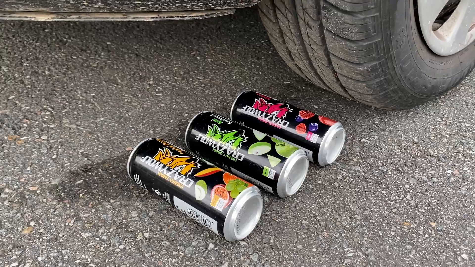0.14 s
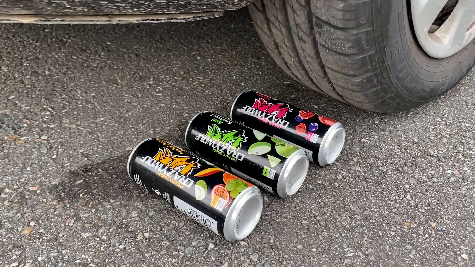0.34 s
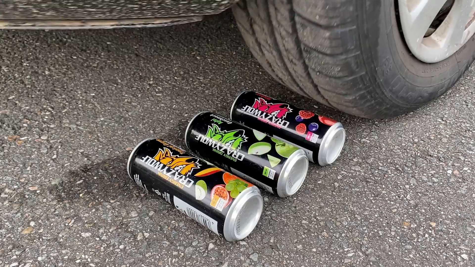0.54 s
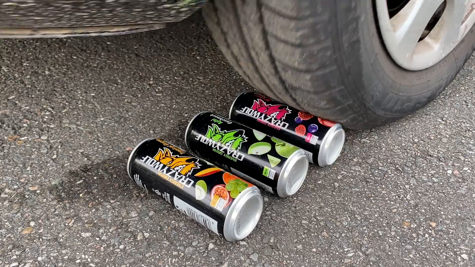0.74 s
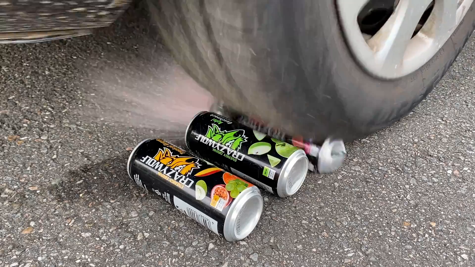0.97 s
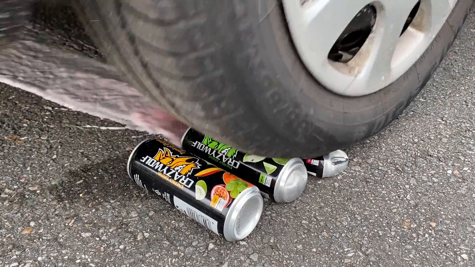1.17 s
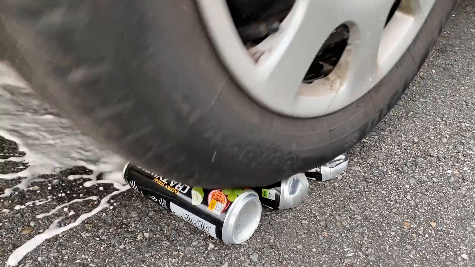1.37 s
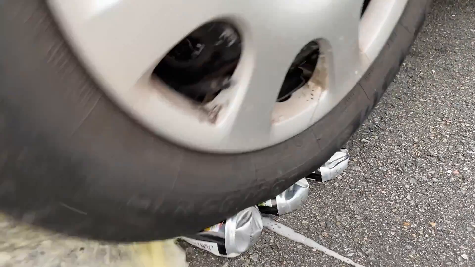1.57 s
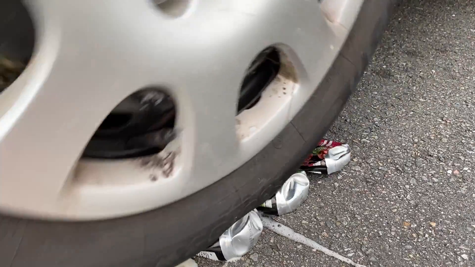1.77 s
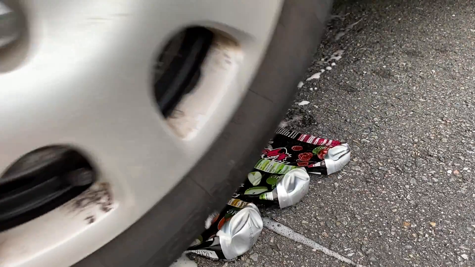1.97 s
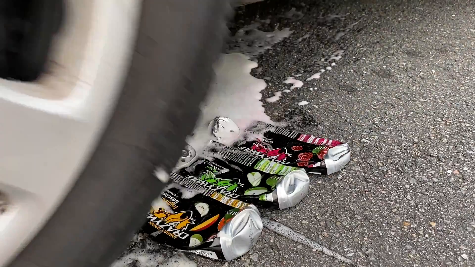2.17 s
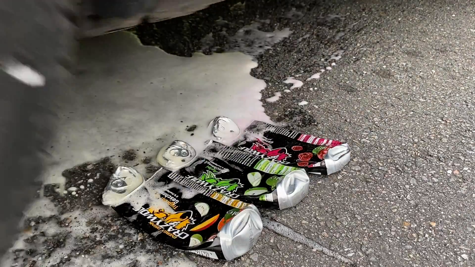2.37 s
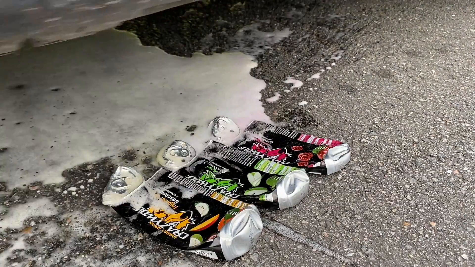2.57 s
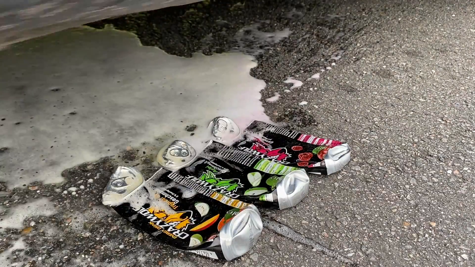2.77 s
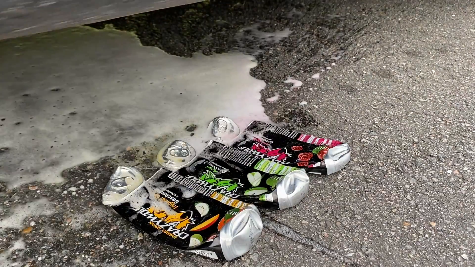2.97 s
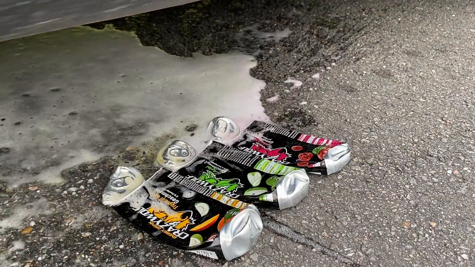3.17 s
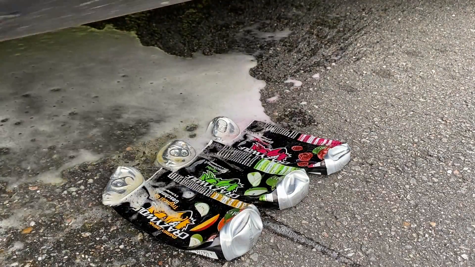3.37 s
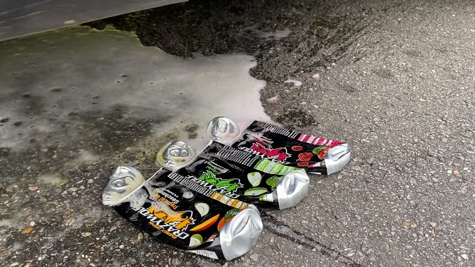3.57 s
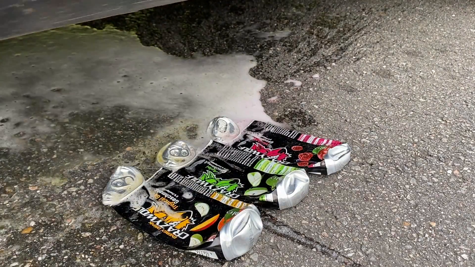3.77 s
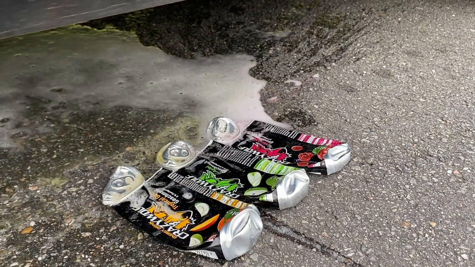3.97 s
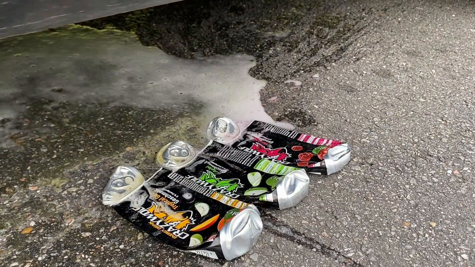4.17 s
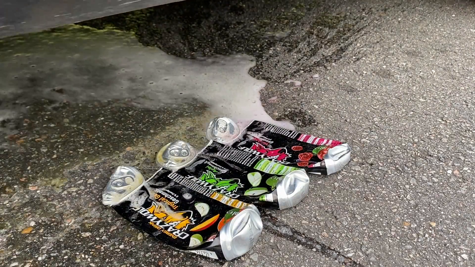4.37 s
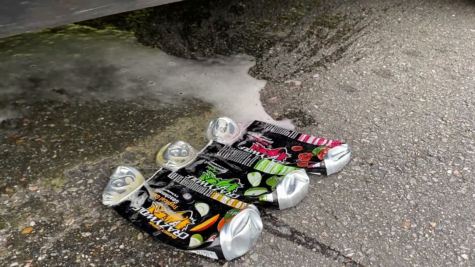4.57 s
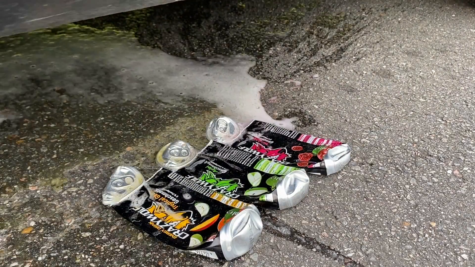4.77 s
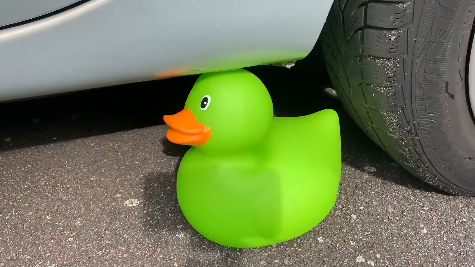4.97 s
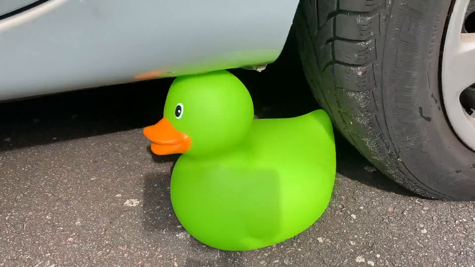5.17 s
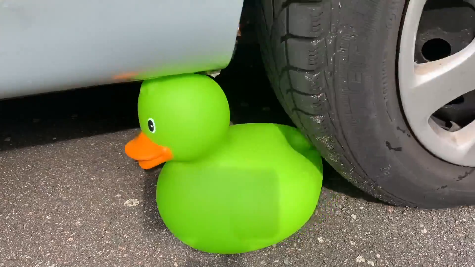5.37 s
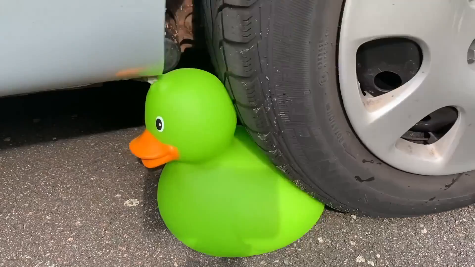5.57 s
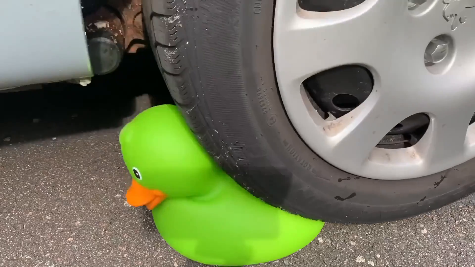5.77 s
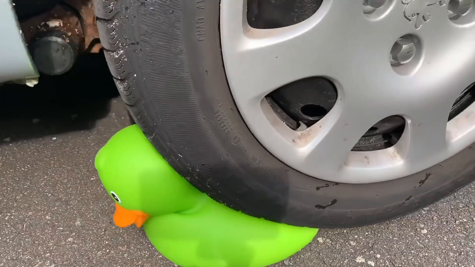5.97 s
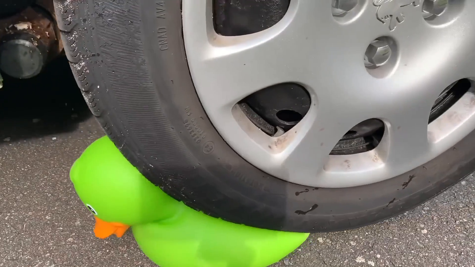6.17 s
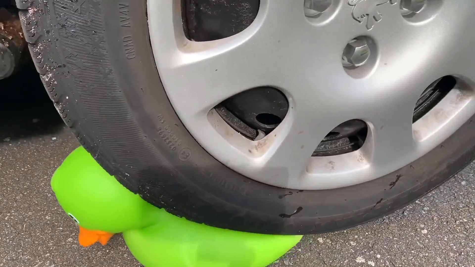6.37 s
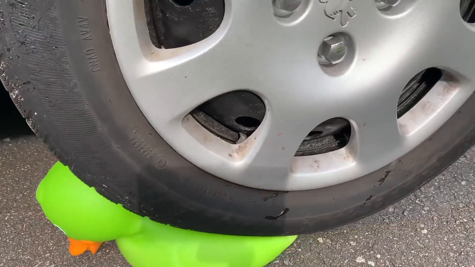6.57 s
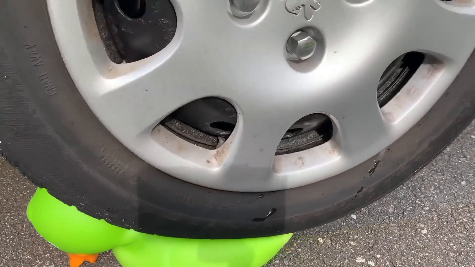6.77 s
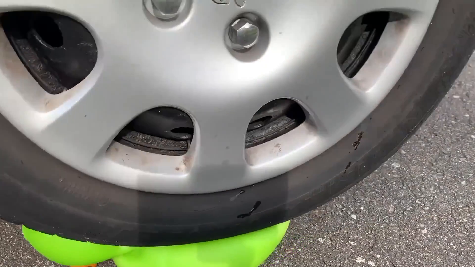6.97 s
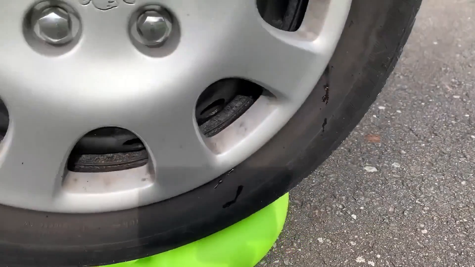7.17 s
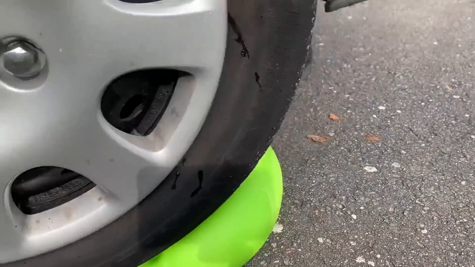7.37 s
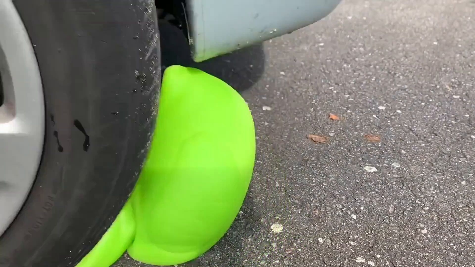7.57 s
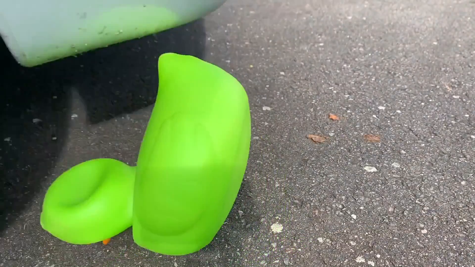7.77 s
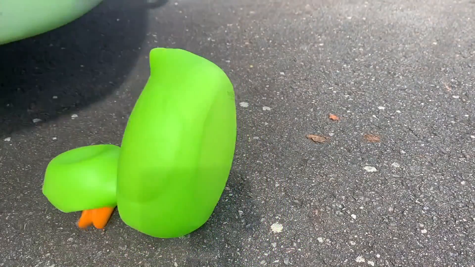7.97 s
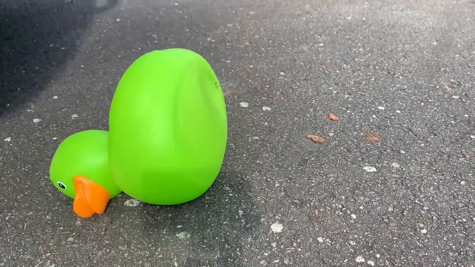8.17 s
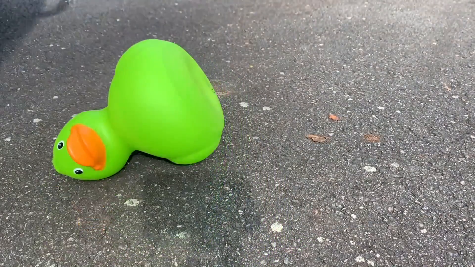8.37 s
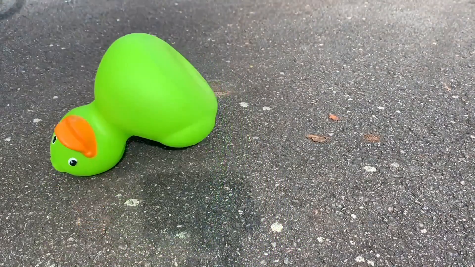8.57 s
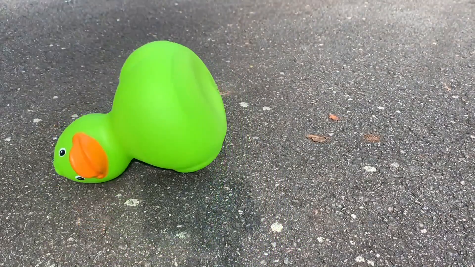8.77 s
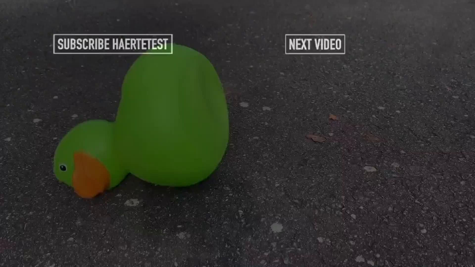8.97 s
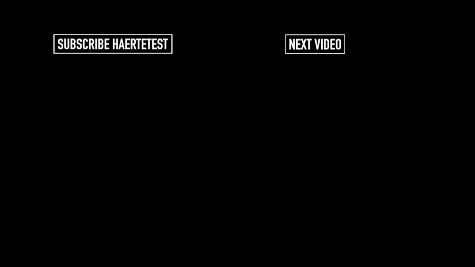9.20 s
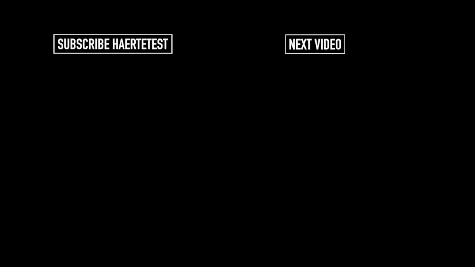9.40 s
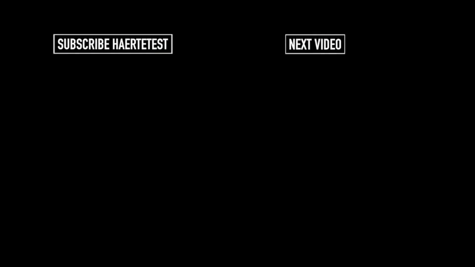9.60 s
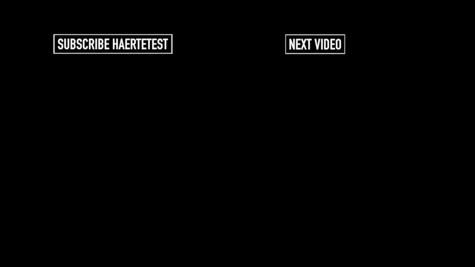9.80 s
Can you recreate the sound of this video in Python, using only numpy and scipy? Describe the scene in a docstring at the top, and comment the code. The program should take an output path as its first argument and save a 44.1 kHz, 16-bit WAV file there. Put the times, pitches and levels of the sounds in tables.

```python
"""Ticking engine noise and a straining hum come first, then loud metallic cracks: a car rolls over three full
drink cans on asphalt and idles some way off. The second scene is close to its exhaust: the engine revs up and
down while a tyre squashes a hollow rubber toy, then all fades. Engines are multiples of the firing rate under
resonances, plus noise bands; cans are noise bursts with damped modes; the toy is pops, grit and scrapes."""
import sys
import numpy as np
from scipy import signal
from scipy.fft import rfft, irfft, next_fast_len
from scipy.io import wavfile
from scipy.ndimage import uniform_filter1d, map_coordinates

SR = 44100
rng = np.random.default_rng(int(sys.argv[2]) if len(sys.argv) > 2 else 0)


def int16_out(signal):
    """Quantize to a 16-bit WAV file."""
    q = np.round(np.clip(np.atleast_2d(signal).T, -1, 1) * 32767)
    wavfile.write(sys.argv[1], SR, q.astype(np.int16))


N = 433944
T = np.arange(N) / SR

# street noise, three bands: t/s, rumble level/dB, roar level/dB, hiss level/dB
STREET_LEVELS = [(0.0, -44.5, -36.5, -44.5), (0.3, -40.5, -36, -43), (0.62, -34, -31.5, -38),
                 (0.82, -36, -30.5, -35), (0.94, -24, -55, -44.5), (1.05, -41.5, -43.5, -48),
                 (1.3, -33, -37.5, -40.5), (1.48, -44, -40.5, -42.5), (1.79, -49, -47.5, -51.5),
                 (2.15, -50, -45, -54.5), (2.55, -57, -49.5, -54), (2.84, -53.5, -51.5, -55.5),
                 (3.45, -55.5, -52.5, -57.5), (3.98, -54.5, -53, -58), (4.38, -50.5, -50, -55.5),
                 (4.98, -48, -48, -54)]
# street band colours: f/Hz, level/dB per Hz
STREET_RUMBLE_COLOUR = [(12, -36.5), (20, -25.5), (80, -4.5), (136, -5), (156, -4), (268, -8), (400, -13),
                        (520, -36.5), (880, -120)]
STREET_ROAR_COLOUR = [(180, -39), (300, -10), (334, -4.5), (402, -10), (438, 1), (587, -3.5), (741, -1.5),
                      (806, -1.5), (1900, -11), (2470, -28.5), (4180, -120)]
STREET_HISS_COLOUR = [(1200, -41.5), (1800, -4), (2400, 0), (3200, -2.5), (4200, -7.5), (5500, -8),
                      (8000, -20), (9000, -29.5), (12000, -21.5), (16000, -63)]
# car body ringing in the street noise: f/Hz, width/Hz, boost/dB
STREET_RINGS = [(742, 35, 1.5), (1350, 33, 2.5), (1800, 150, 1), (2280, 300, 1)]
# left-right likeness, street and close noise: f/Hz, likeness (-1 to 1)
STREET_LIKENESS = [(60, 0.97), (170, .89), (350, 0.35), (800, 0.69), (2000, 0.14), (3000, 0.077),
                   (5000, .3), (7800, 0.075), (8600, -0.21)]
CLOSE_LIKENESS = [(60, 1), (350, 0.92), (700, 0.22), (1300, 0.16), (3000, .14), (7000, 0.094), (8400, 0.36)]
# left-right balance of the noise: f/Hz, left over right/dB
LEFT_OVER_RIGHT = [(60, 0), (250, 0), (500, 2), (900, 4), (1500, 1), (2600, 3), (5000, 0.5), (8000, -0.5)]
# sheet metal under the car: f/Hz, flutter width/Hz, relative level/dB, loudest at t/s, swell scale/s
PANELS = [(350, 12, -71, 3.6, 1.3), (447, 12, -69, 3.6, 1.3), (1760, 160, -66, 4.5, .45),
          (750, 40, -60, 2.3, .3), (900, 200, -57, 2.82, .12), (1580, 20, -54, 5.57, .07),
          (533, 25, -44, 5.55, .3), (754, 12, -36, 5.5, .3), (926, 20, -46, 5.7, .12),
          (795, 12, -36, 6.57, .13), (750, 15, -40, 6.45, .1), (926, 20, -36, 6.66, .14),
          (1080, 20, -41, 7.03, .12), (1080, 40, -40, 6.67, .04), (1233, 40, -52, 6.75, .1),
          (1583, 20, -42, 6.81, .07), (2213, 25, -48, 6.9, .09), (2100, 25, -50, 7.02, .06),
          (3144, 30, -54, 6.77, .09), (3540, 60, -50, 6.65, .02), (3596, 20, -54, 6.92, .06),
          (4113, 20, -50, 6.81, .045), (4800, 60, -57, 6.43, .05), (4850, 90, -50, 6.66, .04),
          (4947, 60, -51, 6.88, .18), (2430, 70, -66, 8.1, .15), (3200, 70, -67, 8.12, .07),
          (2500, 50, -67, 8.4, .12), (3160, 90, -63, 8.57, .05), (1900, 60, -65, 8.8, .1),
          (538, 25, -46, 8.8, .24), (380, 12, -46, 8.75, .13), (5916, 12, -75, 8.93, .19)]
# engine from the side, arriving, rolling on, idling: t/s, firing rate f/Hz, load level/dB, first multiple level/dB
FAR_ENGINE = [(0.15, 31, -57, -70), (0.46, 33.16, -46, -57), (0.66, 36.1, -36, -52), (0.83, 39.7, -35, -49),
              (1.0, 37.7, -60, -64), (1.7, 35.13, -59.5, -73), (2.1, 36.36, -45, -61),
              (2.33, 34.1, -56, -70), (2.45, 33.2, -66, -66), (3.3, 26.9, -54.5, -72),
              (3.41, 24.7, -54, -72), (3.54, 24.92, -45.5, -82), (3.93, 23.56, -48, -78),
              (4.3, 23.41, -50, -76), (4.88, 23.46, -40, -67), (4.97, 23.24, -42, -63)]
# 2nd to 8th multiples from the side, above load: f/Hz, level/dB
FAR_BOOM = [(48, -24), (62, 3.5), (72, 1), (82, -0.5), (95, -17), (108, -23.5), (120, -16.5), (145, -12),
            (165, -18.5), (190, -13.5), (260, -28.5)]
# exhaust resonances, from the side and close: f/Hz, width/Hz, level/dB
FAR_PIPE = [(119.6, 20.54, -2.5), (195, 20, -2.5), (257.5, 49, -11)]
CLOSE_PIPE = [(168, 31.3, -1.5), (256, 34, 1.5), (314, 43, -9), (385, 35, -11), (535, 45, -13),
              (640, 50, -12), (943, 123, -19)]
# first can straining before it gives: t/s, f/Hz, relative level/dB
GROAN = [(0.49, 211.6, -54), (0.53, 201.5, -28.5), (0.56, 286.4, -37), (0.6, 289, -26), (0.656, 261, -30),
         (0.72, 227, -39), (0.78, 202, -44)]
# engine near the tail pipe; the first multiple booms most with the throttle shut:
# t/s, firing rate f/Hz, load level/dB, first multiple level/dB
CLOSE_ENGINE = [(4.99, 32.8, -20.5, -23), (5.13, 35, -18, -30), (5.3, 37.6, -18.5, -31),
                (5.55, 40.06, -17.5, -37), (5.73, 40.45, -18, -44), (5.82, 38.77, -18, -36),
                (5.9, 35, -32, -27), (6.01, 30.17, -26, -21), (6.16, 27.16, -22, -26),
                (6.3, 27.98, -16, -21.5), (6.39, 31.63, -12.5, -22.5), (6.5, 38.6, -16.5, -18),
                (6.57, 42.44, -14.5, -27), (6.63, 46.9, -8, -21), (6.73, 54.84, -6, -20),
                (6.78, 57.5, -5.5, -18), (6.84, 60.5, -5, -20), (6.92, 63.07, -5.5, -18),
                (7.0, 64.54, -5.5, -21.5), (7.08, 61.44, -4.5, -28), (7.14, 56.7, -9.5, -25.5),
                (7.22, 52.67, -16.5, -24), (7.32, 46.27, -26.5, -24), (7.51, 37.4, -22.5, -25),
                (7.6, 31.9, -26, -22), (7.68, 28.65, -30, -19.5), (7.81, 26.56, -40.5, -24.5),
                (7.87, 26.2, -37, -33.5), (8.12, 24.02, -43, -32.5), (8.35, 21.46, -28.5, -46),
                (8.45, 24.04, -24.5, -33), (8.5, 27.64, -20.5, -26), (8.55, 31.58, -19.5, -23),
                (8.6, 34.4, -16, -20), (8.65, 37.03, -18.5, -25), (8.72, 38.23, -18.5, -31.5),
                (8.84, 37.6, -18.5, -29.5), (9.0, 33.62, -21.5, -36.5), (9.15, 31.8, -30, -32)]
# 2nd to 8th multiples, above load: f/Hz, near end level/dB, level once rolled past/dB
CLOSE_BOOM = [(44.8, -9, -2), (58.9, -6.5, -10), (68.6, -12.5, -18), (83.5, -3, 0), (94.8, -10.5, -20),
              (102.7, -19.5, -31), (118.3, -32.5, -34.5), (127.6, -11.5, -10.5), (139, -9.5, -8.5),
              (158.4, -5, -4.5), (172.8, -9, -12), (190.3, -22.5, -29), (218.8, -17.5, -12.5),
              (231, -18.5, -5.5), (249, -23.5, -8.5), (267.4, -20, -5.5), (308, -26, -25),
              (340, -28.5, -28), (400, -47, -30), (519, -34.5, -36)]
# own strength of the 2nd to 8th multiples: level/dB
MULTIPLES_DB = [1, -0.5, 1.5, -3, -5.5, -4.5, -3.5]
# multiples coming and going with the throttle: t/s, 2nd level/dB, 4th level/dB, 5th to 8th level/dB
THROTTLE = [(4.99, 3, 2, 2.5), (5.5, -1.5, 1.5, 2), (5.7, 0, 2, 2.5), (5.86, -13, 2, -2),
            (6.08, -12, 5, 7.5), (6.25, -3, 7, 2), (6.36, -1.5, -3, -3), (6.43, 2, 3, 4.5), (6.5, 3, -1, 7),
            (6.57, 2.5, -4.5, 12), (6.64, 4, 11, 7), (6.71, 5, 5, -3), (6.82, 7, -10, -4),
            (6.95, -1.5, 0, 2), (7.13, -10, -11.5, -13), (7.2, -5, -20, -4), (7.3, 3, -2, -6),
            (7.7, -2.5, -0.5, 1), (8.3, 2, -9, -5), (8.45, -6, 5, 4), (8.52, -1, 8, 6), (8.6, 0, 0.5, -4),
            (8.7, -7, 2, -3), (8.9, -11, -1, -3), (9.15, -6, -4, 0.5)]
# tail pipe moving across: t/s, phase by which left leads/rad
PIPE_SWING = [(4.99, -0.32), (6.8, -0.26), (7.6, -0.17), (8.5, 0.36), (9.2, 0.49)]
# noise near the tail pipe: t/s, rumble level/dB, roar level/dB, hiss level/dB
CLOSE_LEVELS = [(4.99, -45, -31.5, -46), (5.2, -33, -31.5, -44), (5.55, -45, -28.5, -42),
                (5.8, -49, -31, -44), (5.88, -65, -31.5, -49), (6.02, -29.5, -34, -43),
                (6.23, -33, -35, -40), (6.32, -35, -32.5, -44.5), (6.45, -32, -29.5, -40.5),
                (6.65, -37, -22.5, -35), (6.88, -48, -23, -34.5), (7.11, -45, -26, -40),
                (7.24, -63, -31, -44.5), (7.52, -36, -34, -48.5), (7.72, -36.5, -36, -49),
                (7.82, -37, -42, -52.5), (8.1, -40, -43.5, -52), (8.36, -32, -42.5, -53.5),
                (8.57, -24, -39, -49.5), (8.68, -30, -39.5, -51.5), (8.96, -38, -42.5, -55),
                (9.15, -38, -49.5, -61)]
# close band colours: f/Hz, level/dB per Hz
CLOSE_RUMBLE_COLOUR = [(12, -28.5), (20, -20.5), (49, 0.5), (107, -2), (193, -2.5), (336, -24.5),
                       (400, -18.5), (520, -55), (880, -120)]
CLOSE_ROAR_COLOUR = [(190, 2.5), (330, -1), (444, -2.5), (643, -2), (774, -4.5), (849, -9.5), (913, -10),
                     (1110, -9), (1340, -17.5), (1600, -18), (2080, -22), (3520, -120)]
CLOSE_HISS_COLOUR = [(820, -18), (1400, -1), (2100, 1), (3000, -4), (3800, -5), (5000, -6.5), (5700, -8.5),
                     (9400, -8), (11300, -25), (13000, -7), (14800, -15.5), (15600, -52.5)]
# narrow resonances in the close noise: f/Hz, width/Hz, boost/dB
CLOSE_RINGS = [(529, 35, 3.5), (629, 35, 3.5), (764, 25, 4), (925, 16, 8), (1094, 30, 2), (1170, 72, 3),
               (1440, 25.8, 1.5), (1587, 20, 9), (2046, 38, 5), (2210, 35, 7), (2410, 25, 8), (2730, 28, 8),
               (2950, 36, 5), (3140, 28, 9), (3300, 31, 4.5), (3620, 53, 3.5), (4060, 29, 4), (4350, 45, 4),
               (4660, 60, 5), (4970, 44, 6.5)]
# rubber dents popping: t/s, relative level/dB, nominal f/Hz, t60/s
POPS = [(6.484, -29.5, 820, 0.04), (7.4117, -20.5, 803, 0.02), (7.426, -30.5, 742, 0.018),
        (7.4955, -23, 338, 0.031), (7.586, -29, 950, 0.014), (7.607, -27.5, 862, 0.025),
        (7.615, -29.5, 900, .04), (7.647, -24.5, 610, 0.02), (8.085, -25, 294.6, 0.038),
        (8.422, -37.5, 372, 0.023), (8.626, -39, 298.8, 0.015)]
# grit under the tyre: t/s, relative level/dB, treble above it/dB
GRIT = [(5.9369, -36, -25), (6.0292, -33, -22), (6.116, -29, -17), (6.1755, -29, -16), (6.1495, -35, -20),
        (6.2098, -32, -12), (6.2243, -22, -7), (6.2415, -31, -18), (6.2936, -36, -12), (7.6261, -28, -4),
        (7.6364, -26.5, -5), (7.6425, -23, -10), (8.1415, -36, 1), (8.1426, -26, -4), (8.1894, -44, -2),
        (8.4587, -40, 0), (8.4906, -39.5, -10)]
# tread dragging over rubber: t/s, level before jerks/dB, duration/s, band from f/Hz, band to f/Hz
SCRAPES = [(5.238, -36.5, 0.059, 900, 3960), (5.275, -36, 0.092, 900, 4490), (5.36, -41.5, .025, 900, 3997),
           (6.125, -42, 0.0072, 1507, 3505), (6.166, -39, .024, 2010, 5500),
           (6.197, -42, 0.026, 2500, 5500), (5.82, -39.5, 0.02, 1500, 3040),
           (5.936, -45.5, 0.012, 1500, 2797), (5.645, -44, 0.013, 900, 3557),
           (7.599, -39, 0.037, 800, 4000), (7.628, -31, .036, 700, 5280)]
# drops and small creases: t/s, relative level/dB
SPATTER = [(.83, -37), (1.0, -38.5), (1.08, -52), (1.25, -43.5), (1.32, -40), (1.46, -29), (1.55, -35.5),
           (1.65, -33.5), (1.72, -38), (1.78, -42.5), (1.95, -41)]
# can walls buckling: t/s, relative crack level/dB; relative to it: thump/dB, belly/dB, wall/dB, fold/dB,
# treble/dB; wall f/Hz, fold f/Hz, nominal t60/s
BUCKLES = [(0.8276, -3, -16, -8.5, -5.5, -8.5, 1.5, 610, 1920, 0.05),
           (0.8676, -20.5, -7, 7, -1.5, -5, 1, 710, 1800, .047),
           (0.906, -0.5, -41, -8, -8, -9, -2, 1350, 1820, 0.029),
           (0.967, -3.5, -10.5, -12.5, -2, 1.5, -0.5, 805, 3260, 0.028),
           (1.0962, -1.5, -43, -18, -8.5, -4.5, -3, 1120, 3310, 0.037),
           (1.1328, -3, -38, -8.5, -4.5, -7, -2.5, 1060, 2800, 0.026),
           (1.1573, -22, 4.5, -18, -5, -6, 0, 1160, 2570, 0.032),
           (1.2126, -7.5, -15, -2.5, -3, -10, 0, 1003, 1930, 0.077),
           (1.246, -27, 8, -13, -3, -5.5, 4.5, 700, 1895, 0.11),
           (1.288, -16, -13, -35, -5, -4, 2, 1040, 1810, 0.022),
           (1.333, 1, -39, -14, -12, -9.5, -3.5, 696, 2400, 0.043),
           (1.3655, -2, -17, -7.5, -6, -3, -3, 1050, 1888, 0.027),
           (1.3938, -12.5, -13, 2, -0.5, -5, -1.5, 513, 3070, 0.012),
           (1.416, -11, 2, -16, -12, -4, 4, 1360, 1774, 0.11),
           (1.4187, -13, -35, -5.5, 7.5, -12, -1, 774, 2244, 0.046),
           (1.4468, -15, -5, -10, -10, -8, -0.5, 1470, 1786, 0.085),
           (1.4876, -26, -3, -7, -1.5, -2, 2, 1090, 1810, .038),
           (1.531, -26, -21, -11, -1, -7, 0, 790, 1880, 0.0098),
           (1.538, -30, -16, -17, -14, -5, 0, 1500, 3500, 0.011),
           (1.5648, -24.5, -9, -13, -1.5, -3.5, -8, 750, 2200, 0.076),
           (1.6052, -19, -24, -21, -5, -1, -14, 990, 1980, 0.024),
           (1.618, -25, -24, -12, 3, -4, 2, 1000, 1700, 0.016),
           (1.6254, -29, -24, -19, -9, -4, 4, 1200, 3500, .012),
           (1.632, -28, -20, -14, 3, -7, 0, 1050, 2210, 0.028),
           (1.6393, -22.5, -14, -8, 1, -5, 1.5, 740, 1857, .04),
           (1.6532, -23, -10, -10, -4, -2.5, -3.5, 710, 2060, 0.036),
           (1.6866, -33, -13, -2, -7, -2.5, -11, 1530, 1900, 0.046),
           (1.7163, -23, -19, -16, -8, -0.5, -7, 1530, 1700, 0.03),
           (1.7478, -26, -26, -16, -2, -7.5, 0, 1100, 1877, 0.018),
           (1.7566, -26.5, -26, -14, -19, 3, 1, 1380, 1990, 0.086),
           (1.7665, -24, -32, -26, -24, 2, -1, 1390, 2280, .036),
           (1.783, -22, -31, -14, -8, 0, 2.5, 970, 1742, 0.017),
           (1.817, -32.5, -25, -11, -1, 1, -7, 1470, 2050, 0.028),
           (1.874, -35, -16, -6, 2.5, -6, -2, 1520, 2030, 0.022)]
# can modes: nominal f/Hz, relative level/dB, t60/s
CAN_MODES = [(253, 5, 0.086), (448, -15, 0.12), (550, -8.5, 0.063), (694, -7, 0.12), (900, -9.5, 0.057),
             (1008, 0.5, 0.057), (1296, -0.5, 0.061)]
# torn metal and torn edge colours: f/Hz, level/dB per Hz
CRACK_COLOUR = [(710, -23), (1200, -7.5), (1890, -8), (2120, -8.5), (2450, -6.5), (2780, -6.5), (3570, -7),
                (5500, -17.5), (7150, -47), (12100, -120)]
EDGE_COLOUR = [(3500, -35), (4800, -15), (6500, -6.5), (8200, -10.5), (9200, -37.5), (11500, -42.5),
               (13000, -59), (16000, -57)]
# cans dull at the top: f/Hz, gain/dB
CANS_TOP = [(8000, 0.5), (9500, -7.5), (13000, -12), (16000, -21.5)]

LEAD_S = 0.0004375  # left leads
CLATTER_HZ, CLATTER_AT_S, CLATTER_SCALE_DB, CLATTER_ENDS_S = 23.5, 0.041, 4.5, 0.62  # approaching engine ticks
IDLE_PULSE_AT_S, IDLE_FROM_S, IDLE_SETTLES_S, IDLE_SCALE_DB = 4.538, 2.78, .4, 1.5
HIGHER_DB, HIGHER_PAST_DB, FAR_HIGHER_DB = -19.5, -16.5, -25  # multiples above the 8th, above load
SHUT_DULLS = 0.37  # dB lost above the 4th multiple per dB of the first above (load - 13 dB)
UPPER_UNSTEADY_DB = .2  # extra wavering per multiple above the 4th
PAST_S, PASSING_S = 7.82, 0.24  # wheel clears the toy; duration of the change
FADE_END_S, FADE_S = 9.15, 0.077
THROB_HZ, THROB_AT_S, THROB_SCALE_DB = 32, .53, 7
POP_RISE_S, POP_GLIDE_S, POP_GLIDE_HZ = 0.0008, .0018, 753
GRIT_T60_S = 0.009
FIRST_BELLY_HZ, LATER_BELLY_HZ, FIRST_BURSTS_S = 198, 235.7, 0.91  # higher once the first can has burst
SOFT_DULLS = 0.17  # dB of torn noise lost per dB that a fold is softer
TREBLE_FROM_HZ, TREBLE_FULL_HZ = 1800, 3013
CANS_LEFT_DB = 3  # left over right
TOP_HZ = 15900


def amp(db):
    """dB to amplitude factor."""
    return 10 ** (np.asarray(db) / 20)


def unit(x):
    """Scale to rms 1."""
    return x / np.sqrt(np.mean(x ** 2) + 1e-20)


def along(points, hz):
    """Interpolate (Hz, value) points on a log axis."""
    f, v = np.transpose(points)
    return np.interp(np.log(hz + 1), np.log(f + 1), v)


def shape(points):
    """Gain over frequency through (Hz, dB) points."""
    return lambda hz: amp(along(points, hz))


def resonance(hz, centre_hz, width_hz):
    """Resonance peak of height 1, width_hz wide at half height."""
    return 1 / (1 + (2 * (hz - centre_hz) / width_hz) ** 2)


def ringing(points, rings):
    """A colour with narrow resonances standing on it."""
    boost_db = lambda hz: sum(db * resonance(hz, centre, width) for centre, width, db in rings)
    return lambda hz: shape(points)(hz) * amp(boost_db(hz))


def curves(rows):
    """One value per sample for each column, and a gate open while the table lasts."""
    s, *columns = np.transpose(rows)
    gate = np.clip(np.minimum(T - s[0], s[-1] - T) / .004 + 1, 0, 1)
    return [np.interp(T, s, column) for column in columns], gate


def wobble(rate):
    """Smooth random curve, rate knots a second."""
    return map_coordinates(rng.standard_normal(int(N * rate / SR) + 4), [T * rate])


def filtered(x, response):
    """Apply a complex response of frequency."""
    m = next_fast_len(x.shape[-1] + 8192)
    return irfft(rfft(x, m) * response(np.fft.rfftfreq(m, 1 / SR)), m)[..., :x.shape[-1]]


def rush(colour, likeness, gate, patchy_db):
    """Gated stereo noise, scaled to rms 1 before the gate, with time-frequency patches of random gain."""
    z = signal.stft(rng.standard_normal((2, N)), nperseg=1024)[2]
    field = uniform_filter1d(rng.standard_normal(z.shape[1:]), size=3, axis=0)
    field = uniform_filter1d(field, size=5, axis=1)
    white = signal.istft(z * amp(patchy_db * unit(field)), nperseg=1024)[1][:, :N]

    def mid_side(hz):
        angle = np.arccos(np.clip(along(likeness, hz), -1, 1)) / 2
        return colour(hz) * np.array([np.cos(angle), np.sin(angle)])

    def left_lead(hz):
        balance = amp(np.outer([.5, -.5], along(LEFT_OVER_RIGHT, hz)))
        led_hz = hz * (hz > 300) * (hz < 8000)
        return balance * np.exp(1j * np.pi * LEAD_S * np.outer([1, -1], led_hz))

    mid, side = filtered(white, mid_side)
    return unit(filtered(np.array([mid + side, mid - side]), left_lead)) * gate


def puff(spectrum, t, apart=0.11):
    """Short coloured noise for each ear, partly shared."""
    white = rng.standard_normal(len(t)) + apart * rng.standard_normal((2, len(t)))
    return unit(filtered(white, shape(spectrum)))


def add(track, s, sound):
    """Mix a stereo sound in at s seconds."""
    track[:, round(s * SR):][:, :sound.shape[-1]] += sound


def lag(boom):
    """Minimum phase that goes with resonances of this strength, over frequency."""
    hz = np.arange(1024.)
    log_gain = np.log(amp(boom(hz)))
    phase = -signal.hilbert(np.r_[log_gain, log_gain[:0:-1]]).imag[:len(hz)]
    return lambda f: np.interp(f, hz, phase)


def engine(table, boom, phase, own_db, higher_db, pipe_modes, unsteady_db):
    """Multiples of the firing rate as phasors, picked out by body and pipe resonances; also the firing phase."""
    (hz, load_db, first_db), gate = curves(table)
    on = gate > 0
    turn = 2 * np.pi * np.cumsum(hz * (1 + .002 * wobble(20))) / SR
    low_db = [first_db] + [load_db + db + boom(k * hz) for k, db in enumerate(own_db, start=2)]
    dull_db = -SHUT_DULLS * np.maximum(first_db - load_db + 13.0, 0)
    sound = np.zeros(N, complex)
    for k in range(1, 19):
        if k <= len(low_db):
            upper = max(k - 4, 0)
            start = np.pi / 2 - .12 * k * k  # lines the multiples up into one push per firing
            waver_db = (unsteady_db + UPPER_UNSTEADY_DB * upper) * wobble(12)
            level_db = low_db[k - 1] + (upper > 0) * dull_db + waver_db
            angle = k * turn + phase(k * hz) + 0.063 * upper * wobble(12) + start
            sound[on] += amp(level_db)[on] * np.exp(1j * angle[on])
        else:
            pipe = sum(amp(db) * resonance(k * hz[on], centre, width) for centre, width, db in pipe_modes)
            level_db = load_db + higher_db + dull_db + 1.5 * wobble(15)
            angle = k * turn + .3 * wobble(14) + 2 * np.pi * rng.random()
            sound[on] += amp(level_db)[on] * pipe * np.exp(1j * angle[on])
    return np.sqrt(2) * gate * sound, turn


def street(turn):
    """Engine bay, tyre and traffic as three restless noise bands; ticks at first, pulses with firings at idle."""
    levels, gate = curves(STREET_LEVELS)
    since = (T - CLATTER_AT_S) * CLATTER_HZ % 1
    dying = np.clip(1 - T / CLATTER_ENDS_S, 0, 1)
    ticking_db = CLATTER_SCALE_DB * dying * (2 * np.exp(-since / 0.35) - .5)
    angle = turn - np.interp(IDLE_PULSE_AT_S, T, turn)
    idling = np.clip((T - IDLE_FROM_S) / IDLE_SETTLES_S, 0, 1)
    pulsing_db = IDLE_SCALE_DB * idling * (np.cos(angle) + 0.26 * np.cos(2 * angle))
    noise = np.zeros((2, N))
    for db, points in zip(levels, (STREET_RUMBLE_COLOUR, STREET_ROAR_COLOUR, STREET_HISS_COLOUR)):
        band = rush(ringing(points, STREET_RINGS), STREET_LIKENESS, gate, patchy_db=2)
        noise += amp(db + 0.69 * wobble(40)) * band
    return amp(ticking_db + pulsing_db) * noise


def panels():
    """Sheet metal buzzes and squeaks: narrow, fluttering tones that swell and go."""
    track = np.zeros((2, N + SR))
    for hz, width, db, s, lasting in PANELS:
        t = np.arange(-1.5 * lasting, 1.5 * lasting, 1 / SR)
        knots = rng.standard_normal((2, int(3 * lasting * width) + 4))
        real, imag = (map_coordinates(row, [(t - t[0]) * width]) for row in knots)
        flutter = .9 + .75 * (real + 1j * imag)
        swell = np.exp(-np.abs(t / lasting) ** 3)
        tone = amp(db) * swell * flutter * np.exp(2j * np.pi * hz * t)
        left_lead = np.exp(1j * np.pi * LEAD_S * hz * (hz < 1000) * np.array([[1], [-1]]))
        add(track, s + t[0], (tone * left_lead).real)
    return track[:, :N] * amp([[3], [1]])


def far_engine():
    """Engine from the side: firing multiples shaped by the boom heard there; also the firing phase."""
    boom = lambda hz: along(FAR_BOOM, hz)
    tones, turn = engine(FAR_ENGINE, boom, lag(boom), MULTIPLES_DB, FAR_HIGHER_DB, FAR_PIPE, unsteady_db=0.5)
    return tones.imag, turn


def groan():
    """The pressed can hums unsteadily at a sliding pitch, throbbing at about the firing rate."""
    (hz, db), gate = curves(GROAN)
    turn = 2 * np.pi * np.cumsum(hz * (1 + 0.033 * wobble(58.8))) / SR
    throb_db = THROB_SCALE_DB * (np.cos(2 * np.pi * THROB_HZ * (T - THROB_AT_S)) - .5)
    level_db = db + throb_db + 1.5 * wobble(40)
    return np.sqrt(2) * gate * amp(level_db) * (np.sin(turn) + 0.19 * np.sin(2 * turn))


def exhaust():
    """Close engine as firing multiples; its colour changes as the car rolls past."""
    past = np.clip((T - PAST_S) / PASSING_S + .5, 0, 1)
    at_hz, near_db, past_db = np.transpose(CLOSE_BOOM)
    near_boom = lambda hz: np.interp(hz, at_hz, near_db)
    boom = lambda hz: (1 - past) * near_boom(hz) + past * np.interp(hz, at_hz, past_db)
    (second_db, fourth_db, upper_db), _ = curves(THROTTLE)
    own_db = []
    for k, db in enumerate(MULTIPLES_DB, start=2):
        own_db.append(db + (k == 2) * second_db + (k == 4) * fourth_db + (k > 4) * upper_db)
    higher_db = HIGHER_DB + past * (HIGHER_PAST_DB - HIGHER_DB)
    return engine(CLOSE_ENGINE, boom, lag(near_boom), own_db, higher_db, CLOSE_PIPE, unsteady_db=1)


def close_car():
    """Exhaust tones plus noise bands; every firing also pushes out a puff of gas noise."""
    tones, turn = exhaust()
    swing = np.interp(T, *np.transpose(PIPE_SWING))
    tones = (tones * np.exp(.5j * np.array([swing, -swing]))).imag * amp([[-.5], [.5]])
    (rumble_db, roar_db, hiss_db), gate = curves(CLOSE_LEVELS)
    roar_db = roar_db + 1.0 * np.sin(turn + 1.43) + 0.81 * wobble(30)
    hiss_db = hiss_db + .9 * np.sin(turn + 1.5) + .8 * wobble(40)
    roar_colour = ringing(CLOSE_ROAR_COLOUR, CLOSE_RINGS)
    hiss_colour = ringing(CLOSE_HISS_COLOUR, CLOSE_RINGS)
    rumble = amp(rumble_db) * rush(shape(CLOSE_RUMBLE_COLOUR), CLOSE_LIKENESS, gate, patchy_db=3.5)
    roar = amp(roar_db) * rush(roar_colour, CLOSE_LIKENESS, gate, patchy_db=1.84)
    hiss = amp(hiss_db) * rush(hiss_colour, CLOSE_LIKENESS, gate, patchy_db=1.5)
    return tones + rumble + roar + hiss


def grit():
    """Grit snaps under the tread: decaying noise with a separate treble part."""
    track, t = np.zeros((2, N + SR)), np.arange(SR // 10) / SR
    for s, db, treble_db in GRIT:
        body = puff([(300, -21.0), (800, 0), (2300, 0), (3500, -3.5), (5500, -13.5)], t)
        treble = puff([(3500, -27.5), (5500, 2.5), (10500, 6.5), (14000, -15.5), (16000, -29.5)], t)
        add(track, s, amp(db - 0.5 - 60 * t / GRIT_T60_S) * (body + amp(treble_db) * treble))
    return track[:, :N]


def scrapes():
    """Rubber slips in quick, uneven jerks: noise with a random envelope."""
    track = np.zeros((2, N + SR))
    for s, db, lasting, from_hz, to_hz in SCRAPES:
        t = np.arange(int(lasting * SR)) / SR
        jerks_db = 3 * wobble(250)[:len(t)] + 1.2 * wobble(45)[:len(t)]
        swell = np.sin(np.pi * t / lasting) ** .6
        colour = [(from_hz / 2, -19), (from_hz, -1.5), (to_hz, -7), (to_hz * 1.42, -18),
                  (to_hz * 6.4, -27), (to_hz * 4, -50)]
        add(track, s, amp(db + jerks_db) * swell * puff(colour, t, apart=1.0))
    return track[:, :N]


def toy():
    """Dents in the hollow rubber pop: damped tones of falling pitch with a little noise."""
    track, t = np.zeros((2, N + SR)), np.arange(SR // 10) / SR
    for s, db, hz, t60 in POPS:
        glide = POP_GLIDE_HZ * POP_GLIDE_S * (1 - np.exp(-t / POP_GLIDE_S))
        tone = np.sin(2 * np.pi * (0.788 * hz * t + glide))
        breath = puff([(200, -30), (hz, 0), (hz * 2, -14), (2500, -36), (5000, -50)], t)
        rise = (1 - np.exp(-t / POP_RISE_S)) ** 2
        add(track, s, amp(db + 8 - 60 * t / t60) * rise * (tone + 0.16 * breath))
    return track[:, :N]


def spatter(count=450):
    """Drops and small creases: short damped grains at random moments, pitches, sizes and places."""
    (db,), gate = curves(SPATTER)
    when, place = rng.random((2, count, 1))
    hz = 1500 * np.exp(0.43 * rng.standard_normal((count, 1)))
    size = amp(3.5 * np.minimum(rng.exponential(size=(count, 1)), 3.5))
    t = np.arange(500) / SR
    grain = size * np.exp(-t * hz / 7.0) * np.sin(2 * np.pi * hz * t)
    first_s, last_s = SPATTER[0][0], SPATTER[-1][0]
    at = (SR * (first_s + when * (last_s - first_s))).astype(int) + np.arange(len(t))
    sides = (1 - 0.27 * place, .5 + 0.54 * place)
    ears = [np.bincount(at.ravel(), (grain * side).ravel(), N) for side in sides]
    return amp(db - 8.0) * gate * np.array(ears)


def can_ring(t, belly_db, wall_db):
    """Damped can modes; the wall changes shape with every fold, so its modes shift."""
    hz, level_db, t60 = np.transpose(CAN_MODES)[:, :, None]
    draw = rng.standard_normal((3, len(CAN_MODES), 1))
    strength_db = level_db - 7.0 + 3 * draw[0] + np.where(hz < 300, belly_db, wall_db)
    shifted_hz = hz * (1 + .05 * draw[1] * (hz > 300))
    modes = amp(strength_db - 60 * t / t60) * np.sin(2 * np.pi * shifted_hz * t + draw[2])
    return modes.sum(axis=0)


def cans():
    """Each buckle: a ragged crack of torn metal and a thump; belly, wall and fresh fold ring after it."""
    track, t = np.zeros((2, N + SR)), np.arange(SR // 3) / SR
    rise = 1 - np.exp(-t / .0005)
    for s, db, thump_db, belly_db, wall_db, fold_db, treble_db, wall_hz, fold_hz, t60 in BUCKLES:
        belly_hz = FIRST_BELLY_HZ if s < FIRST_BURSTS_S else LATER_BELLY_HZ
        after = np.maximum(t - 0.0041 * amp(db / 2), 0)  # a big fold keeps tearing for a moment
        ragged = amp(2.6 * np.interp(t, t[::30], rng.standard_normal(len(t[::30]))))  # the fold runs in jerks
        spray = amp(-30.0 - 60 * t / 0.14)  # liquid keeps spraying under the crack
        fall = amp(-2.5 - 60 * after / t60) + spray
        fold = puff([(fold_hz * 0.6, -40), (fold_hz * 0.82, -8), (fold_hz, 0), (fold_hz * 1.2, -8),
                     (fold_hz * 1.7, -40), (fold_hz * 3, -80)], t)
        tilt = lambda f: amp(np.interp(f, (TREBLE_FROM_HZ, TREBLE_FULL_HZ), (0, treble_db)))
        torn = 0.9 * amp(SOFT_DULLS * db) * filtered(puff(CRACK_COLOUR, t, apart=0.69), tilt)
        edge = amp(-18.5 - 60 * after / 0.61) * puff(EDGE_COLOUR, t, apart=1.2)  # treble dies first
        crack = ragged * fall * (torn + amp(fold_db) * fold + amp(treble_db) * edge)
        crush_noise = puff([(150, -12.5), (350, -1), (900, -0.5), (1600, -7.0), (2500, -47.0), (6000, -90)], t)
        crush = amp(wall_db + 1.5) * ragged * fall ** 0.64 * crush_noise
        ring = can_ring(t, belly_db, wall_db)
        wall = amp(wall_db + 5.0 - 60 * t / (0.83 * t60)) * np.sin(2 * np.pi * wall_hz * t)
        belly_rise = 1 - np.exp(-t / 0.0014)
        belly = amp(belly_db + 6.0 - 60 * t / 0.087) * belly_rise * np.sin(2 * np.pi * belly_hz * t)
        thump = amp(thump_db + 7.5 - 60 * t / 0.085) * np.sin(2 * np.pi * 75 * t)
        whole = crack + crush + ring + wall + belly + thump
        ears = amp(db - 7.5 + CANS_LEFT_DB * np.array([[.5], [-.5]]))
        add(track, s, ears * rise * whole)
    return filtered(track[:, :N], shape(CANS_TOP))


def scene():
    """Cans with the car to the side, then the toy by the exhaust; close car and panels fade at the end."""
    far, turn = far_engine()
    side = (far + groan()) * amp([[.3], [-.3]])
    fade = np.clip((FADE_END_S - T) / FADE_S, 0, 1)
    first = street(turn) + side + spatter() + cans()
    second = fade * (close_car() + panels()) + grit() + scrapes() + toy()
    return first + second


def record(dry):
    """Round off the loudest peaks, then cut everything from the band limit up."""
    soft = dry / (1 + np.abs(dry / .97) ** 5) ** (1 / 5)
    return filtered(soft, lambda hz: hz < TOP_HZ)


dry = scene()
out = record(dry)
int16_out(out)
```